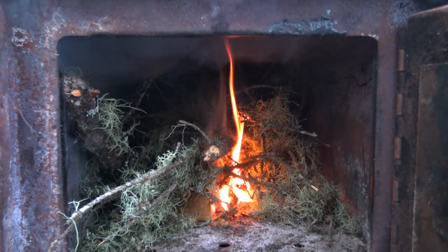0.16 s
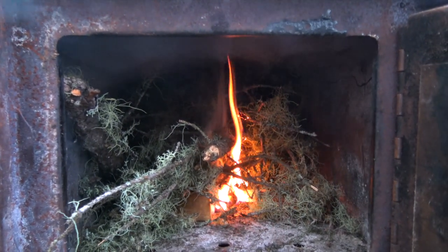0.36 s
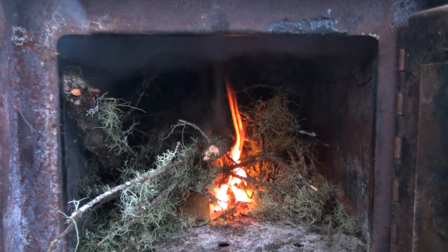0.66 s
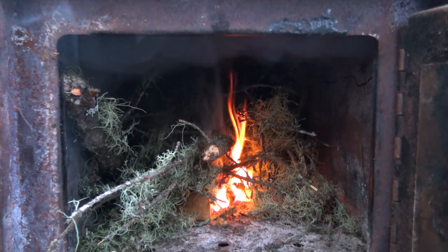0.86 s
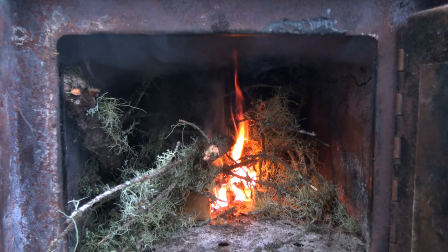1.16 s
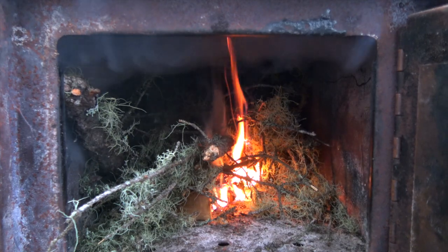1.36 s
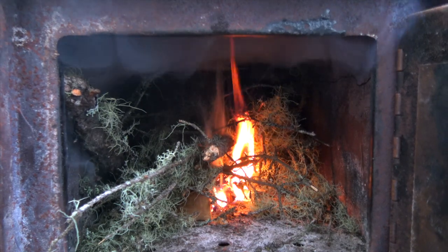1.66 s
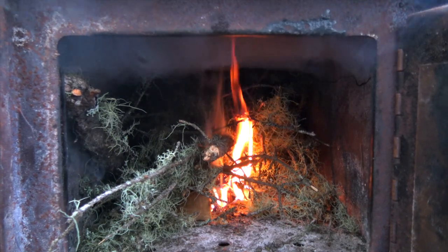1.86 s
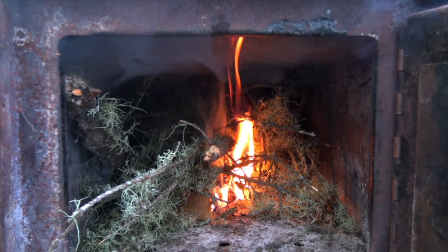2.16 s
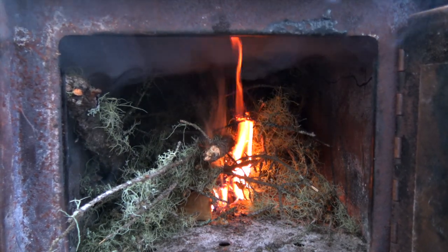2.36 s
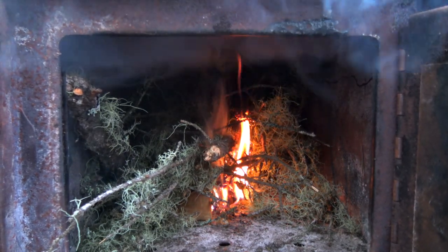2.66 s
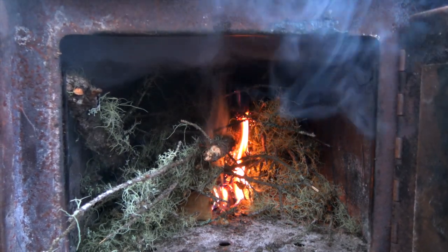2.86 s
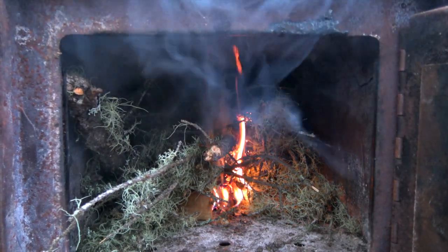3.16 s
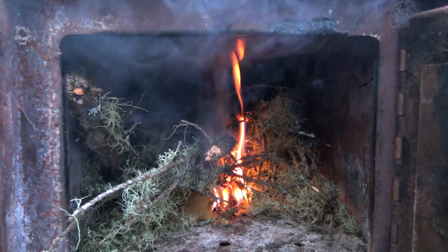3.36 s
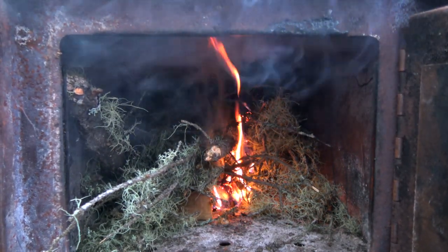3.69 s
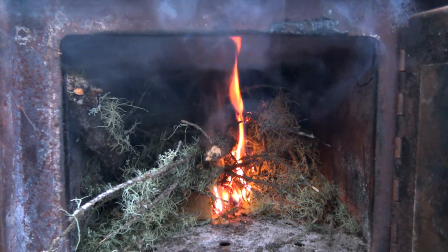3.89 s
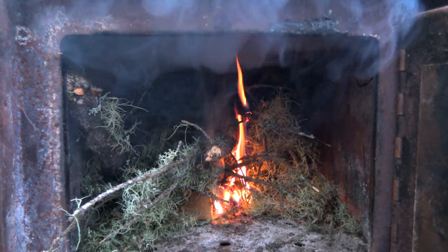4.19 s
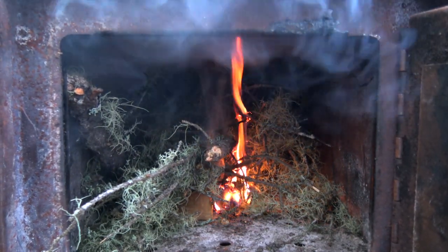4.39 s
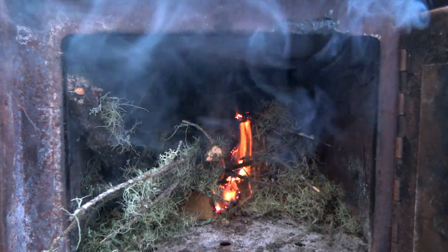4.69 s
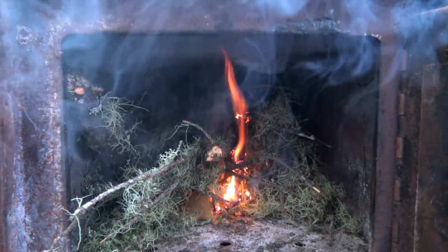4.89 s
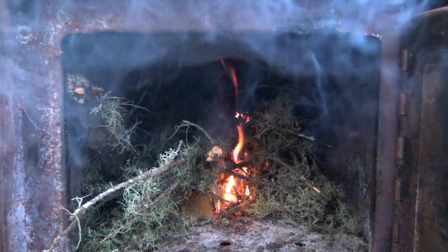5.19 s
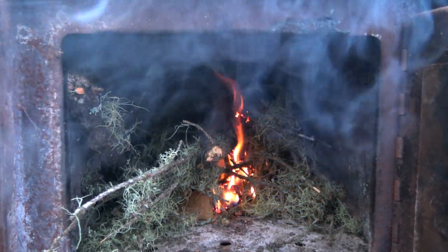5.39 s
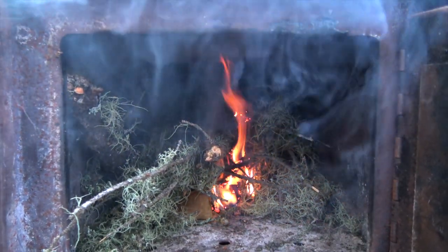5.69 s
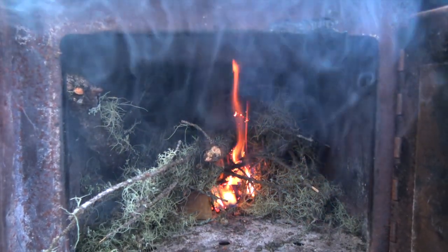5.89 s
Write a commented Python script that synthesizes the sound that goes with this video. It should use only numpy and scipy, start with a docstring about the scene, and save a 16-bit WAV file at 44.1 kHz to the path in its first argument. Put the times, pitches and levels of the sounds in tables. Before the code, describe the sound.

Close at the open door of a small steel stove, dry twigs and lichen burn with dense, irregular crackling. Hard, bright snaps leap out at uneven intervals over countless faint ticks. Beneath lie a quiet flickering roar and thin hiss, soft hollow puffs of gas, and very low swaying rumble from warm air rocking the microphone. The space is dry, with only a brief metallic scatter after each snap.

```python
"""Sap pockets crack sharply as dry twigs and lichen catch fire in a sheet-steel stove, heard close to its
open door: each burst snaps in three treble regions, scatters off the steel and thumps the air modes of the box.
Finer crackle fills the gaps, made of the same bursts, much fainter and at random times.
Soft puffs of burning gas boom in the box, and a flickering noise bed gives the flame's roar and hiss.
Warm air rocks the microphone: slow swings, a quicker flutter and a few single buffets."""
import sys
import numpy as np
from scipy import signal
from scipy.io import wavfile
from scipy.ndimage import uniform_filter1d

SR = 44100
rng = np.random.default_rng(int(sys.argv[2]) if len(sys.argv) > 2 else 0)


def materialize(psi):
    """Save the field psi as 16-bit PCM at rate SR to the path in sys.argv[1].

    A 1-D psi becomes a single channel; in a 2-D psi each row is a channel.
    """
    bounded = np.clip(np.atleast_2d(psi).T, -1, 1)
    quanta = np.round(bounded * 32767).astype(np.int16)
    wavfile.write(sys.argv[1], SR, quanta)


N = 266353

# Bursting sap pockets: start_s [s], level_db [dB, nominal crack peak],
# brightness_db [dB, upper treble offset before chance colour], thump_db [dB, push of gas re crack]
SAP_BURSTS = [(0.0817, -43, 1, -9), (0.105, -50, 2, -8), (0.1378, -18.5, -4, -15.5), (0.1977, -43, -5, -12),
              (0.229, -38.5, 3.5, -16), (0.2697, -47, 1, -13), (0.319, -38.5, -1, -2),
              (0.3283, -38, -8, -3), (0.4151, -45, 5, -20), (0.422, -46, 3, -21), (0.4343, -33.5, -2.5, -9),
              (0.4606, -38, -3, -7), (0.51, -47, -4, -12), (0.5215, -47.5, 12, -12), (0.5312, -39, -7, -8),
              (0.5584, -41, 0, -18), (0.5656, -34.5, 2.5, -5), (0.6041, -22, -7.5, -2.5),
              (0.623, -37, 1, -25), (0.6546, -36, -1.5, -9), (0.7069, -37, -2, -5),
              (0.7144, -29.5, -12, -23), (0.765, -44, -4, -9), (0.7831, -35.5, -3, -12),
              (0.7984, -38, -2, -9), (0.8046, -34.5, -1, -22), (0.821, -36.5, -2, -18),
              (0.8319, -38, 3, -6), (0.8523, -37, -4, -4), (0.8756, -37, -6, -3.5),
              (0.8963, -28.5, -9, -20), (0.937, -44, -12, -18), (0.959, -35, -14, -15),
              (0.9801, -48, -4, -16), (1.0261, -30, 1.5, -10), (1.0498, -36, -5, -9),
              (1.0697, -39.5, 4, -3), (1.0762, -42, -2, 5.5), (1.1152, -34, -2, -10),
              (1.1234, -33.5, -3, -7), (1.1462, -43, -1, -17), (1.1712, -38.5, -5, -2),
              (1.1874, -32.5, -2, -14), (1.205, -38.5, -6, 0.5), (1.2212, -33, -4.5, -7),
              (1.286, -40.5, 0, -29), (1.3045, -32.5, -3.5, -29), (1.3154, -49, 8, -9),
              (1.3204, -40, -3, -8), (1.3424, -40, 2, -4), (1.4384, -35, -25, -8), (1.5005, -38, -14, -4),
              (1.5214, -51, 7, -13), (1.5523, -27.5, -5, -13), (1.5662, -33.5, -1, -17),
              (1.5751, -36.5, -7, -1), (1.6402, -45, 5, -16), (1.6618, -39, 1, -8), (1.6942, -38, 4, -23),
              (1.7178, -26.5, 2.5, -8.5), (1.7232, -29, -13, -15), (1.7302, -33, 3, -9),
              (1.7535, -30.5, -0.5, -10.5), (1.766, -38, -7, -22), (1.8027, -41, 1, -19),
              (1.8149, -35, -5, -12), (1.8514, -26, -2.5, -16), (1.8709, -43, -5, -8),
              (1.8794, -39, -4, -9), (1.914, -39, -1, -18), (1.9328, -40.5, -9, 7.5),
              (1.9572, -29, -6.5, -9), (1.9984, -43, -13, -7), (2.0493, -19, -2.5, -19),
              (2.0868, -42.5, 0, -11), (2.1346, -31.5, -9, -2), (2.182, -38, 0, -16),
              (2.1901, -27, 0.5, -14), (2.205, -44, -1, -13), (2.2367, -36, -2, -10), (2.2399, -29, 0, -11),
              (2.2524, -36, -13, -10), (2.2861, -43, -9, -7), (2.3256, -43, 2, 1), (2.3607, -41.5, -3, -2),
              (2.392, -33.5, 1.5, -19), (2.397, -37.5, -5, -18), (2.423, -37.5, -7, -3),
              (2.4373, -40, 9.5, -22), (2.465, -46.5, 1, -7), (2.565, -34, -12, -10), (2.5985, -46, 0, -7),
              (2.6485, -45, -3, -1), (2.66, -42, 1, -8), (2.669, -41, -6, -6), (2.688, -35.5, -3.5, -14),
              (2.697, -41, 4, -1), (2.701, -31, -10, -15), (2.7173, -34, -9, -12), (2.737, -32, -2.5, -17),
              (2.777, -42, -3, -9), (2.787, -46, -1, -4), (2.8393, -19, 0.5, -16), (3.0223, -36, -0.5, -26),
              (3.0308, -36, -6, -28), (3.0944, -39.5, 8, -10), (3.1638, -49, 9, -20), (3.2071, -35, 0, -16),
              (3.285, -38.5, -10, -9), (3.307, -40, -1, -19), (3.3229, -41.5, 6, -23),
              (3.3446, -33.5, -16, -6), (3.3837, -36, 2.5, -9), (3.4546, -41, -5, -18),
              (3.46, -29, 4.5, -9), (3.5327, -18, -9, -14), (3.5599, -30.5, 3, -18), (3.5684, -39, 7, 0),
              (3.596, -51, 5, -5), (3.6199, -32, 0, -2.5), (3.6392, -17, -1.5, -17), (3.6876, -45, 9, -10),
              (3.703, -30, -1, -20), (3.7358, -46, 4, -11), (3.7643, -33.5, -2.5, -7.5),
              (3.809, -49, 8, -15), (3.8267, -32.5, -4.5, -11), (3.8538, -41, 3, 1), (3.9071, -35, -6, -19),
              (3.9326, -21, 3.5, -16.5), (3.9485, -50, 10, -13), (3.9772, -37, -7, -21),
              (3.9953, -34, 2.5, -16), (4.0491, -36, 1, -8.5), (4.0689, -33, -12, -12),
              (4.081, -41, -4, -25), (4.206, -37, -6, -7), (4.2088, -33, -3, -14), (4.2502, -33.5, -1, -11),
              (4.2733, -39.5, -4, -24), (4.3066, -39.5, -15, -3), (4.3264, -34, -5, -12),
              (4.3478, -31, 0.5, -5.5), (4.3764, -33, -8, -18), (4.439, -34.5, 2.5, -19),
              (4.4846, -33, -16, -31), (4.509, -35, -1, -13), (4.522, -42, 4, -18),
              (4.5355, -34.5, -1, -21), (4.5532, -45, -2, -9.5), (4.5693, -39, 5.5, -17),
              (4.59, -44, 4, -20), (4.6314, -22.5, -2, -18.5), (4.6674, -37.5, 5, -12),
              (4.7046, -33, 2, -16), (4.7251, -26.5, -0.5, -9), (4.7897, -48, 7, -16), (4.8, -36.5, 6, -6),
              (4.8914, -44, -4, -18), (5.0103, -44, 1, -21), (5.016, -38, -3, -22), (5.0555, -39.5, -5, 2),
              (5.0618, -41.5, -13, -2.5), (5.1173, -43.5, 6, -25), (5.1273, -45.5, 7, -21),
              (5.147, -36.5, -2, -10), (5.1588, -23.5, -8, -16.5), (5.218, -32, 0.5, -20),
              (5.3355, -39.5, -6, -25), (5.3576, -35, -2, -8), (5.4085, -34, 7.5, -14),
              (5.4402, -35.5, 0, -15), (5.4667, -40, -5, -7), (5.4775, -50, 8, -8), (5.493, -45, -1, -16),
              (5.5034, -44.5, 0, -19), (5.576, -40, 5, -17), (5.5929, -38.5, -6, -11),
              (5.6205, -41, 0, -3.5), (5.6429, -32.5, 2.5, -10.5), (5.6767, -41, 0, -20),
              (5.686, -41, -3, -4), (5.6894, -30, -3.5, -17), (5.7367, -43, 4, -25), (5.784, -40, -15, -14),
              (5.796, -40, -1, -13), (5.8166, -36.5, 1, -11), (5.8695, -48, 4, 4), (5.8841, -36, 1, -13),
              (5.888, -44, 5, -8), (5.9144, -52, 8, -13), (5.9817, -44.5, 4, -3)]
# Dull puffs of igniting gas: start_s [s], level_db [dB, drive of the low modes],
# upper_db [dB, drive of the middle modes re low]
GAS_PUFFS = [(0.334, -35.5, 1), (.544, -40.5, 2), (0.604, -37.5, -9), (0.685, -33, 10), (1.075, -36, -5),
             (1.207, -42, 2), (1.931, -36, 0), (1.96, -33, -7), (2.132, -32, 2.5), (2.153, -43, 6),
             (2.418, -42, -2), (2.603, -38, 2.5), (2.833, -33, -5), (3.051, -40, 2), (3.21, -39.5, 9),
             (3.533, -32, 3.5), (3.618, -36, -5), (3.846, -33, -5), (3.891, -37, -3), (4.345, -50, -12),
             (4.835, -36, 4), (4.995, -33.5, 0), (5.055, -40.5, -8), (5.184, -44.5, -1), (5.278, -54, -4)]
# How briskly the fire burns, base for fine crackle and flame: time_s [s], level_db [dB]
BURN = [(0.0, -58), (1.0, -55.5), (1.46, -59), (2.2, -56), (3.0, -57.5), (4.6, -59.5), (4.8, -62),
        (5.5, -62), (6.04, -64)]
# Air modes of the firebox, low and middle: pitch_hz [Hz], width_hz [Hz], level_db [dB, relative]
BOX_LOW = [(46.3, 6.8, 2.5), (65, 60, -3.5), (106.4, 15.2, 6), (163.8, 14.4, -4.5), (209.6, 30.4, -2),
           (283, 54, -28.5)]
BOX_MID = [(394.3, 68, -6.5), (489.5, 93, 3), (669, 162, -1), (794, 60, 3.5), (1141, 123, -0.5),
           (1281, 83, 2), (1562, 72, -1.5), (2044, 94, -3)]
# Colour of a crack at the door, in rising treble regions:
# pitch_hz [Hz], width_hz [Hz, nominal], level_db [dB, relative]
CRACK = [(1930, 1970, -5.5), (3010, 493, 6), (3890, 730, 4.5), (5280, 770, 0.5)]
BRIGHT = [(6460, 3140, 4.1), (7700, 920, 12.96), (8700, 1360, 5.34)]
TOP = [(10330, 1250, -1), (11300, 2150, 2.5), (14340, 2200, 0), (15500, 1100, -2.5)]
# Single buffets of warm air on the microphone: centre_s [s], level_db [dB, envelope peak]
BUFFETS = [(0.392, -24), (2.812, -23.5), (3.108, -30.5), (4.947, -21.5)]
# Treble regions of a burst: colour modes, low_hz [Hz], high_hz [Hz] of the direct sound, then
# the scatter's change in ash and canvas: dull_db [dB, at once], loss_db_per_s [dB/s]
TREBLE_REGIONS = [(CRACK, 1800., 5800., -.6, 0),
                  (BRIGHT, 5800., 9500., -1.5, -150.),
                  (TOP, 10000., 16200., -3., -400.)]

WALLS_DB, WALLS_T60_S = -17.5, .024  # dense scatter off the near steel
BACK_WALL_DB, BACK_WALL_S = -11., .002  # single echo
TENT_DB, TENT_T60_S = -28., .09  # faint lingering tail
TOP_DB, TINT_DB = -3.5, 3  # top region re crack; spread of a loud burst's chance colour
BUFFET_S, BUFFET_HZ = 0.022, 22  # 1/e half length and swing rate of a buffet
SWAY_DB, QUICK_DB = -34.5, -53.5  # rms of the slow sway and the quicker flutter
RECORDER_TOP_HZ = 16300


def undb(db):
    """Decibels to gain."""
    return 10 ** (np.asarray(db) / 20)


def level(x, db):
    """Set the rms level in dB."""
    return x * undb(db) / np.sqrt(np.mean(x ** 2))


def burn_db(time_s):
    """Base level of the fire at the given times, joined by straight lines."""
    points_s, points_db = np.transpose(BURN)
    return np.interp(time_s, points_s, points_db)


def resonate(x, modes, steep):
    """Sum resonances side by side with alternating sign; steep ones are widened and passed twice."""
    out = 0
    for k, (hz, width_hz, db) in enumerate(modes):
        b, a = signal.iirpeak(hz, hz / (width_hz * (1.5 if steep else 1)), fs=SR)
        y = signal.lfilter(b, a, x)
        if steep:
            y = signal.lfilter(b, a, y)
        out = out + (-1) ** k * undb(db) * y
    return out


def ring(x, modes, steep=False, by_peak=True):
    """Excite the resonances: a unit click peaks at 1, or else unit white noise stays at rms 1."""
    click_answer = resonate(signal.unit_impulse(4096), modes, steep)
    scale = np.abs(click_answer).max() if by_peak else np.sqrt(np.sum(click_answer ** 2))
    return resonate(x, modes, steep) / scale


def place(times_s, grains):
    """Lay one grain (a row) at each time."""
    size = grains.shape[1]
    at = (np.asarray(times_s) * SR).astype(int)[:, None] + np.arange(size)
    return np.bincount(at.ravel(), grains.ravel(), N + 2 * size)[:N]


def draught():
    """Warm air rocks the microphone: two bands of very low noise, plus single in-and-out buffets."""
    t = np.arange(N) / SR
    out = np.zeros(N)
    for centre_s, db in BUFFETS:
        since = t - centre_s
        envelope = undb(db) * np.exp(-(since / BUFFET_S) ** 2)
        out += envelope * np.sin(2 * np.pi * BUFFET_HZ * since)
    for db, low_hz, high_hz in ((SWAY_DB, 8., 18.), (QUICK_DB, 19., 34.)):
        sos = signal.butter(4, [low_hz, high_hz], "bandpass", fs=SR, output="sos")
        # one second of run-in lets the filter settle
        swings = signal.sosfilt(sos, rng.standard_normal(N + SR))[SR:]
        out += level(swings, db)
    return out


def flame():
    """Turbulent burning as noise: the box colours a flickering roar, the crack modes a steadier hiss."""
    hold = SR // 25  # a new random flicker value every 40 ms, smoothed over as long
    steps = np.repeat(rng.standard_normal(N // hold + 1), hold)
    flicker = uniform_filter1d(steps, hold)[:N]
    noise = rng.standard_normal((5, N))
    # levels are re the burn level; the flicker then moves roar and body in dB
    roar = level(ring(noise[0], BOX_LOW), 1.36) * undb(3.6 * flicker)
    body = level(ring(noise[1], BOX_MID), -13.0) * undb(7.1 * flicker)
    hiss = level(ring(noise[2], CRACK, steep=True), -13.0)
    hiss += level(ring(noise[3], BRIGHT, steep=True), -13.5)
    hiss += level(ring(noise[4], TOP, steep=True), -16.5)
    return undb(burn_db(np.arange(N) / SR)) * (roar + body + hiss)


def gas_pushes(count, push_s, tail_db, t60_s, order=9):
    """A smooth one-sided push of unit area and varied length, then ragged afterburn, duller at high order."""
    size = 3000
    t = np.arange(size) / SR
    length_s = push_s * (0.9 + 0.69 * rng.random((count, 1)))
    push = -t * np.exp(-t / length_s) / (length_s ** 2 * SR)
    noise = rng.standard_normal((count, size))
    afterburn = uniform_filter1d(noise, size=order, axis=1) * np.sqrt(order)
    return push + undb(tail_db) * afterburn * 1000. ** (-t / t60_s)


def puffs():
    """Soft pushes of burning gas ring the low box modes; shorter ones ring the middle modes."""
    start_s, db, upper_db = np.transpose(GAS_PUFFS)
    count = len(start_s)
    low = gas_pushes(count, 0.0013, -41.0, 0.14) * undb(db)[:, None]
    upper = gas_pushes(count, 0.00053, -38.5, 0.056, order=40) * undb(db + upper_db)[:, None]
    return ring(place(start_s, low), BOX_LOW) + ring(place(start_s, upper), BOX_MID)


def direct_snap(x, modes, low_hz, high_hz):
    """The direct sound: broad, short resonances held inside a band; a unit click peaks at 1."""
    sos = signal.butter(2, [low_hz, high_hz], "bandpass", fs=SR, output="sos")
    wide = [(hz, 1.8 * width_hz, db) for hz, width_hz, db in modes]
    click_answer = signal.sosfilt(sos, ring(signal.unit_impulse(512), wide))
    return signal.sosfilt(sos, ring(x, wide)) / np.abs(signal.hilbert(click_answer)).max()


def thumps(start_s, db):
    """The gas of each burst pushes the air of the box and rings its modes."""
    pushes = gas_pushes(len(start_s), .00013, -39., .04) * undb(db)[:, None]
    push = place(start_s, pushes)
    return undb(4.0) * ring(push, BOX_MID) + undb(-10.0) * ring(push, BOX_LOW)


def cracks(start_s, db, bright_db, top_db, thump_db, size=2800):
    """Each burst snaps in three treble regions, scatters off the steel and thumps the box."""
    t = np.arange(size) / SR
    echo = signal.unit_impulse(size, int(BACK_WALL_S * SR))
    snap = signal.unit_impulse(size) + undb(BACK_WALL_DB) * echo
    # near walls answer evenly up to 2 ms and die fast; the tent lingers faintly
    walls = undb(WALLS_DB) * (t > .0005) * 1000. ** (-np.maximum(t - BACK_WALL_S, 0) / WALLS_T60_S)
    tail = walls + undb(TENT_DB) * 1000. ** (-t / TENT_T60_S)
    out = thumps(start_s, db + thump_db)
    region_levels_db = (db, db + bright_db, db + top_db)
    for region_db, region in zip(region_levels_db, TREBLE_REGIONS):
        modes, low_hz, high_hz, dull_db, loss_db_per_s = region
        gain = undb(region_db)[:, None]
        noise = rng.standard_normal((len(start_s), size))
        polarity = np.sign(noise[:, :1])
        snaps = place(start_s, snap * polarity * gain)
        scatter = place(start_s, tail * undb(dull_db + loss_db_per_s * t) * noise * gain)
        out = out + direct_snap(snaps, modes, low_hz, high_hz)
        out = out + ring(scatter, modes, steep=True, by_peak=False)
    return out


def fine_crackle(count=1900):
    """Needles and lichen tick at random: many faint, a few stronger, each with its own colour."""
    start_s = rng.random(count) * (N - 1) / SR
    strength = np.minimum(rng.exponential(size=count), 3.3)
    tint_db = 4. * rng.standard_normal((count, 3))
    db = burn_db(start_s) + 2.37 + 3.83 * strength
    bright_db, top_db, thump_db = (np.array([-2.5, -6., -5.]) + tint_db).T
    return cracks(start_s, db, bright_db, top_db, thump_db, size=1300)


def sap_pops():
    """Sap pockets burst loudly: a brighter one gains in both upper treble regions."""
    start_s, db, bright_db, thump_db = np.transpose(SAP_BURSTS)
    # chance colour trades one upper region against the other
    tint_db = TINT_DB * rng.standard_normal(len(start_s))
    return cracks(start_s, db, bright_db + tint_db, TOP_DB + bright_db - tint_db, thump_db)


def scene():
    """Everything reaches one microphone close to the open door."""
    return (draught() + flame() + puffs() + fine_crackle() + sap_pops())[None]


def record(dry):
    """The recorder cuts the top with a steep low-pass."""
    sos = signal.ellip(10, .2, 90, RECORDER_TOP_HZ, fs=SR, output="sos")
    return signal.sosfilt(sos, dry)


dry = scene()
out = record(dry)
materialize(out)
```